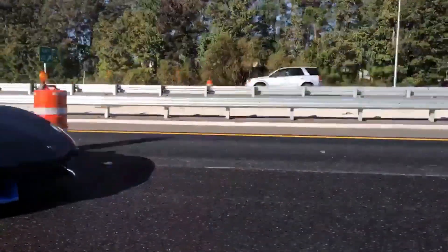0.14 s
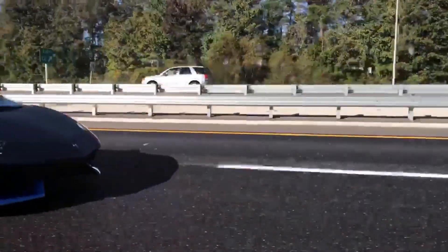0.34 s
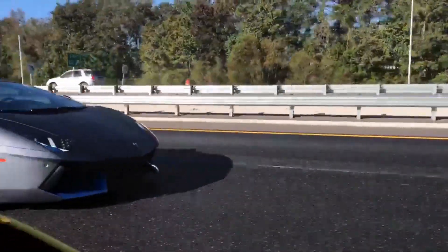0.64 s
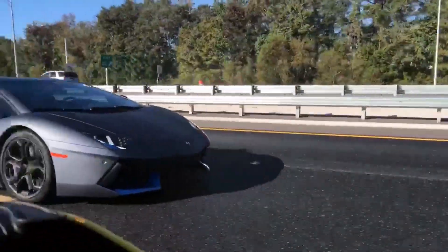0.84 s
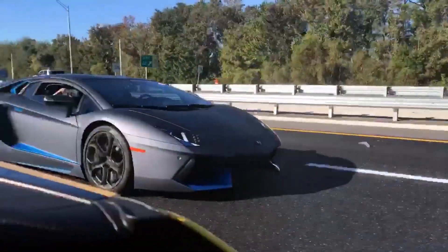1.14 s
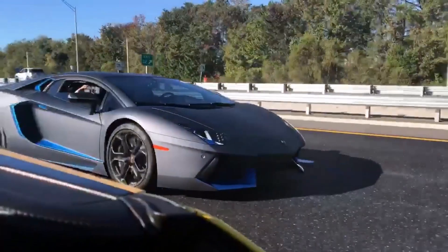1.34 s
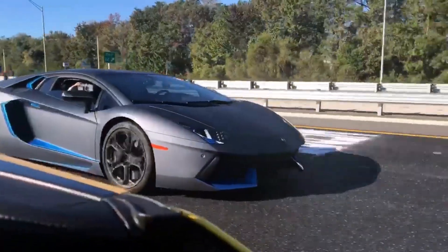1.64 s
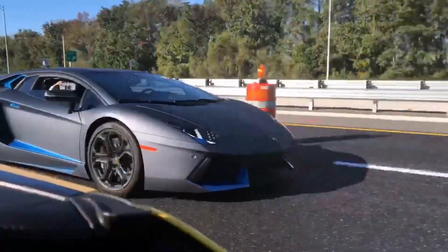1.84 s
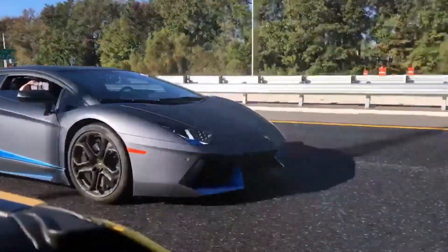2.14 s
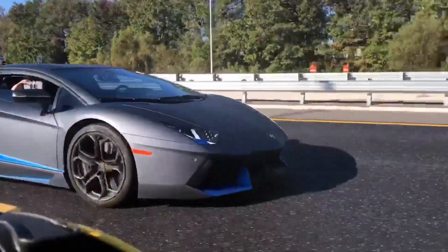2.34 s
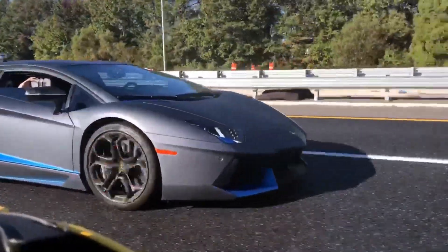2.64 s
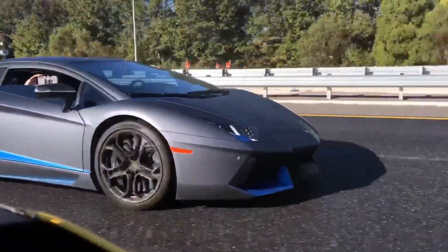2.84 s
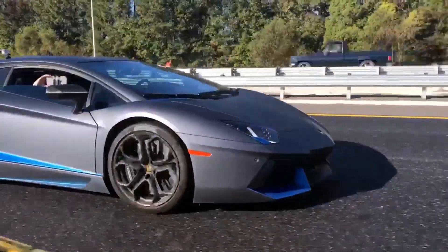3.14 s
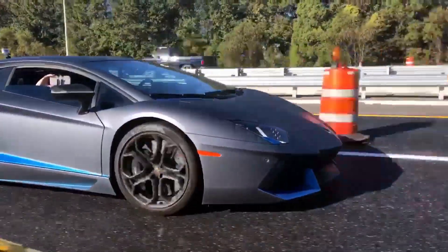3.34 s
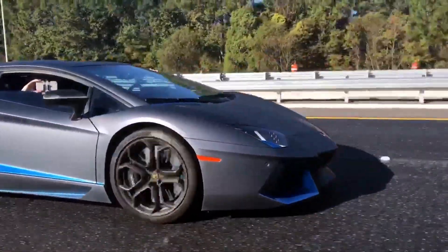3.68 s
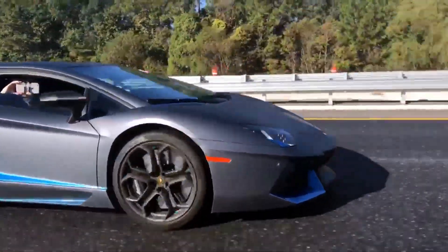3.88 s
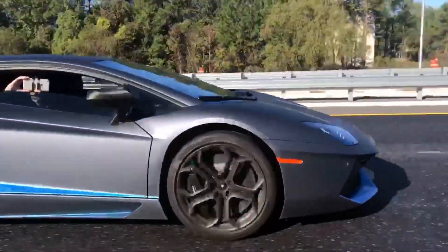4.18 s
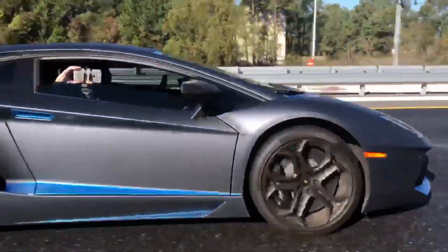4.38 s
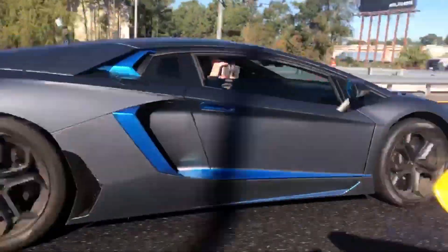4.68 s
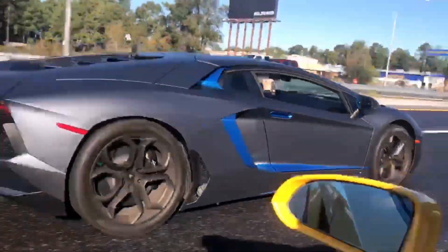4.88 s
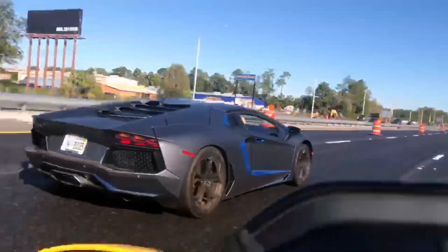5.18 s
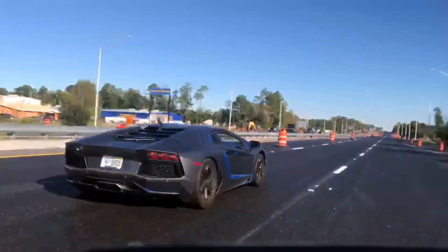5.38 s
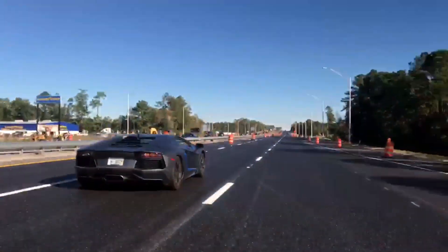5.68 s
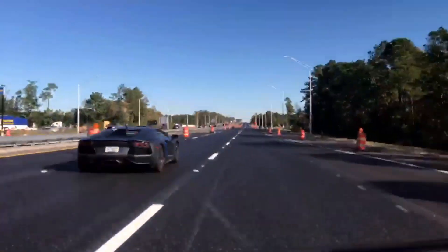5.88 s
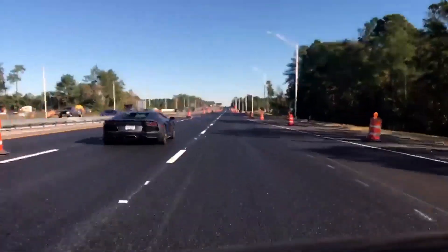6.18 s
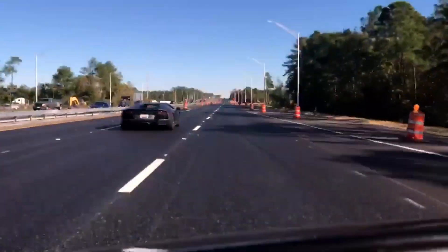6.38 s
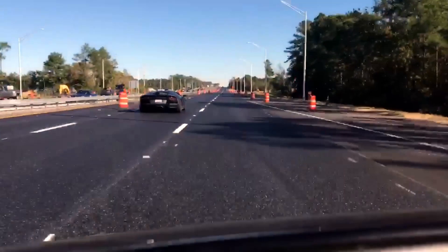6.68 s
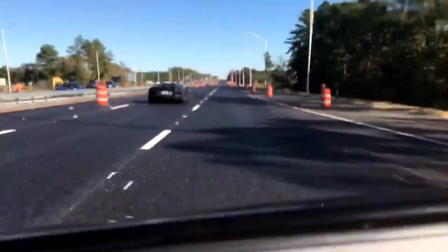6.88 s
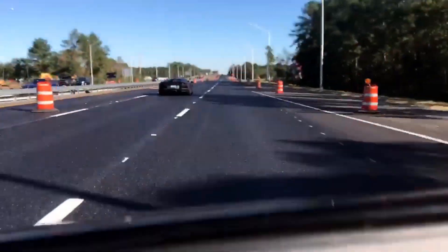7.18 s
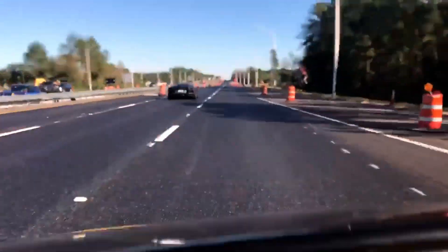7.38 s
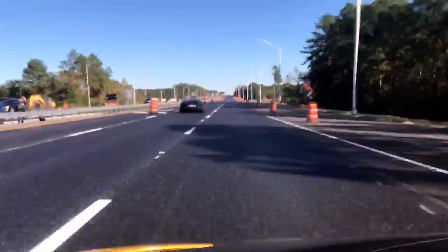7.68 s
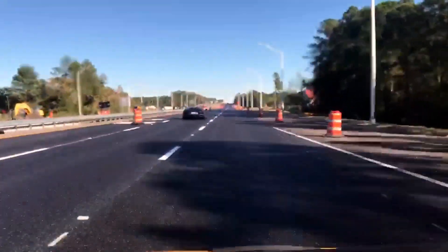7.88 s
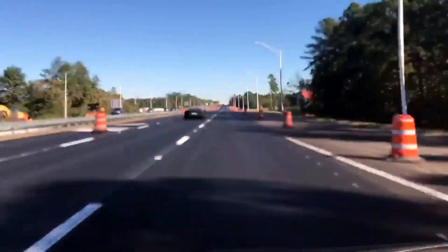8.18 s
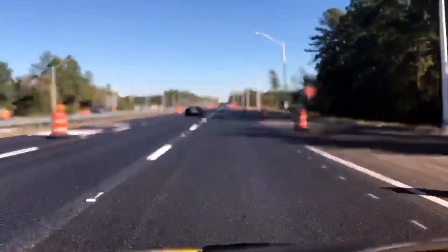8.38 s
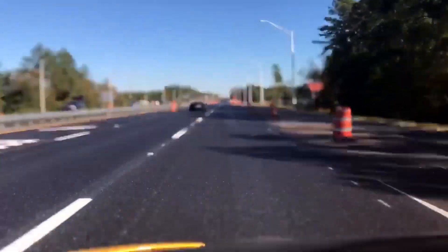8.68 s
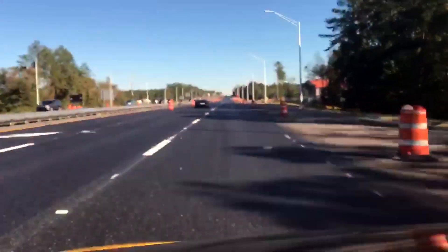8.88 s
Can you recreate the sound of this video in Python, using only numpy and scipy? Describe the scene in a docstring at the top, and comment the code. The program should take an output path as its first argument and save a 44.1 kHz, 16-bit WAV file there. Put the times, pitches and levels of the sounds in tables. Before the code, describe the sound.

Steady low engine hum on a highway, a downshift blip with crackles, a rising twelve-cylinder scream passing close, then overwhelming wind buffeting the microphone.

```python
"""On a highway, beside an open car window: a low engine drone near 240 Hz, then a twelve-cylinder sports car.
It drops gears with a blip and pops, howls past and pulls away; the wind grows in steps to overload.
Engine: rounded orders of the twelve-firing cycle plus gas rasp, set by throttle, view and distance.
Drone: a few harmonics. Tyres, wake and wind: shaped noise. Pops, ticks, bursts and slaps: short and decaying."""
import sys
import numpy as np
from scipy import signal
from scipy.fft import rfft, irfft, next_fast_len
from scipy.io import wavfile
from scipy.ndimage import uniform_filter1d, minimum_filter1d

SR = 44100
rng = np.random.default_rng(int(sys.argv[2]) if len(sys.argv) > 2 else 0)


def transcribe(u):
    """Save the signal u as a 16-bit wav file named by the first command-line argument.

    u: samples, shape (n,) or (channels, n), limited to [-1, 1]; the rate is SR.
    q: integer samples, one column per channel.
    """
    v = np.clip(np.atleast_2d(u).T, -1, 1)
    q = np.round(v * 32767).astype(np.int16)
    wavfile.write(sys.argv[1], SR, q)


N = 398223
T = np.arange(N) / SR


def amp(db):
    """Decibels to gain."""
    return 10 ** (np.asarray(db) / 20)


def unit(x):
    """Scales to an rms of one."""
    return x / np.sqrt(np.mean(x ** 2) + 1e-20)


def curve(rows):
    """Interpolates each column of a timed table to every sample."""
    time_s, *columns = np.transpose(rows)
    return [np.interp(T, time_s, column) for column in columns]


def read(spectrum, hz):
    """Gain of a spectrum table at given frequencies, linear in dB over log frequency."""
    table_hz, db = np.transpose(spectrum)
    return amp(np.interp(np.log(hz + 1), np.log(table_hz), db))


def colour(x, spectrum):
    """Filters a sound by a spectrum table, at unit rms."""
    size = next_fast_len(N + 4096)
    gain = read(spectrum, np.fft.rfftfreq(size, 1 / SR))
    return unit(irfft(rfft(x, size) * gain, size)[:N])


def white():
    """Plain noise."""
    return rng.standard_normal(N)


def wander(hz):
    """Low-passed noise at unit rms: random drift up to a given rate."""
    sos = signal.butter(2, hz, fs=SR, output="sos")
    return unit(signal.sosfilt(sos, rng.standard_normal(N + SR))[SR:])


def band(size, hz, spread):
    """Noise from hz / spread to hz * spread, near unit rms."""
    sos = signal.butter(2, [hz / spread, hz * spread], "bandpass", fs=SR, output="sos")
    # the first second lets the filter settle
    return unit(signal.sosfilt(sos, rng.standard_normal(size + SR)))[SR:]


def ring(hz, rise_s):
    """Damped sine whose envelope peaks at rise_s."""
    t = T[:4096]
    u = t / rise_s
    return np.sin(2 * np.pi * hz * t) * u * np.exp(1 - u)


def ramp(start_s, rise_s):
    """Goes from 0 to 1 and stays there."""
    return np.clip((T - start_s) / rise_s, 0, 1)


def bump(at_s, width_s):
    """Swells from 0 to 1 and back."""
    return np.exp(-((T - at_s) / width_s) ** 2)


def nearness(nearest_s, cover_s):
    """Inverse-square level in dB of a steady pass, 0 at nearest; it covers its nearest distance in cover_s."""
    return -10 * np.log10(1 + ((T - nearest_s) / cover_s) ** 2)


def add(mix, start_s, sound):
    """Lays a sound into the mix."""
    part = mix[round(start_s * SR):][:len(sound)]
    part += sound[:len(part)]


# tyre noise spectrum: freq_hz, density_db
ROAD_SPECTRUM = [(25, -27.5), (45, 10), (100, -4.5), (250, 3), (420, -2.5), (620, -1), (1000, -8.5),
                 (1500, -20.5), (2500, -23.5), (4000, -30.5), (5000, -34.5), (6500, -35.5), (10500, -44),
                 (15500, -45)]
# tyre noise: time_s, level_db
TYRE_LEVEL = [(0, -24), (.8, -26.5), (3.5, -23), (4.3, -28.5), (9, -41)]


def tyres():
    """Tyres on asphalt: shaped noise with slight level wander."""
    return colour(white(), ROAD_SPECTRUM) * amp(curve(TYRE_LEVEL)[0] + 0.93 * wander(11))


# torn-air spectrum: freq_hz, density_db
HISS_SPECTRUM = [(2000, -19.5), (5500, -12), (8000, 8.5), (10400, 3), (12000, 7.5), (16000, 2.5)]


def wake(peak_db=-40, steepness=1.73):
    """Air torn by the passing body: hiss that rises and falls with its distance."""
    return colour(white(), HISS_SPECTRUM) * amp(peak_db + steepness * nearness(nearest_s=5.04, cover_s=0.34))


# steps into the slipstream: start_s, rise_s, buffeting_db, turbulence_db, brightness_db
EXPOSURE_STEPS = [(4.22, 0.16, -31.5, -45, -5), (5.22, 0.069, -20, -25, 3), (6.69, 0.032, -10, -23.5, -2)]
# passing gusts and lulls: centre_s, width_s, buffeting_db, turbulence_db, brightness_db
GUSTS_AND_LULLS = [(.05, .45, -34.5, -64, 0), (2.55, 0.49, -32, -57, 1), (3.45, 0.37, -25, -49, -7),
                   (4.63, .17, -26, -39, -23), (5.37, 0.14, -18, -25.5, 8.5), (6.25, 0.27, -18, -28.5, -9),
                   (7.08, 0.13, -10.5, -24, 5), (8.58, 0.22, -9, -21.5, 6), (8.98, 0.2, -11, -20.5, 1.5)]


def airflow():
    """Buffeting, turbulence and brightness drives in dB: steps hold, gusts pull to their values and let go."""
    sheltered_db = (-40.5, -60, 0)
    state = np.outer(sheltered_db, np.ones(N))
    for shape, rows in (ramp, EXPOSURE_STEPS), (bump, GUSTS_AND_LULLS):
        for at_s, length_s, *target_db in rows:
            state = state + shape(at_s, length_s) * (np.array(target_db)[:, None] - state)
    return state


# wind spectra, low to high: freq_hz, density_db
BUFFET_SPECTRUM = [(20, -23), (40, -8.5), (70, 2.5), (130, 0.5), (220, -6), (400, -14.5), (800, -24.5),
                   (2000, -74)]
ROAR_SPECTRUM = [(60, -45), (150, 3), (270, 3), (500, -0.5), (1000, -6.5), (1600, -15.5), (3000, -36),
                 (6000, -83)]
CRACKLE_SPECTRUM = [(400, -3.5), (1200, 4), (2000, 1), (3500, -3.5), (5000, -13), (6500, -19),
                    (7700, -28.5), (9500, -29), (10500, -48), (16000, -46)]
SIZZLE_SPECTRUM = [(3000, -4), (6000, 4.5), (9500, -6.5), (10600, -8), (15500, -16)]


def wind(impulses_per_s=2400):
    """Large eddies thump the microphone; small ones roar and tear in short bursts."""
    buffet_db, turbulence_db, bright_db = airflow()
    eddies = wander(138)
    pressure = colour(white(), BUFFET_SPECTRUM)
    # tears hardest at pressure peaks, lulls between eddies
    tearing_db = 3.7 * eddies + 3.2 * wander(600) + 1.5 * pressure + wander(12)
    # tiny vortices at the microphone port
    impulses = rng.choice([-1., 1.], N) * (rng.random(N) < impulses_per_s / SR)
    grain = .9 * unit(impulses) + .45 * white()
    buffet = pressure * amp(buffet_db + 2.5)
    roar = colour(white() * amp(3.7 * eddies), ROAR_SPECTRUM) * amp(turbulence_db - 0.1 * bright_db + 11.5)
    crackle = colour(grain * amp(tearing_db), CRACKLE_SPECTRUM) * amp(turbulence_db + 0.95)
    # stronger tearing contrast: the sharpest bursts dominate the treble
    sizzle = colour(grain * amp(1.65 * tearing_db), SIZZLE_SPECTRUM) * amp(turbulence_db + bright_db - 18)
    return buffet + roar + crackle + sizzle


# air throbs in the open window: centre_s, width_s, peak_db
WINDOW_THROBS = [(2.8, 0.4, -25), (4.78, 0.3, -21)]


def window_throbs():
    """Slow throbs of air in the open window: swells of narrow noise near 49 Hz."""
    swell = sum(amp(db) * bump(centre_s, width_s) for centre_s, width_s, db in WINDOW_THROBS)
    return band(N, 49, spread=1.25) * swell


# short noise bursts within the wind: start_s, level_db
WIND_BURSTS = [(5.838, -17), (6.159, -20), (6.396, -13.5), (8.059, -13), (8.511, -16)]


def wind_bursts(centre_hz=3170, decay_s=0.0014):
    """Short noise bursts within the wind: band noise with a fast exponential decay."""
    out, t = np.zeros(N), T[:1024]
    for start_s, db in WIND_BURSTS:
        add(out, start_s, amp(db) * band(len(t), centre_hz, spread=1.5) * np.exp(-t / decay_s))
    return out


# single gusts: start_s, drive_db
GUST_SLAPS = [(2.559, -10.5), (4.437, -13), (4.731, -11), (4.799, -19), (4.934, -14)]


def gust_slaps():
    """Gusts slap the microphone: a damped 150 Hz swing and a 30 ms noise swell."""
    out = np.zeros(N)
    swell = np.hanning(round(.03 * SR))
    for start_s, db in GUST_SLAPS:
        add(out, start_s, amp(db - 4) * ring(150, rise_s=.003))
        add(out, start_s, amp(db - 6) * swell * unit(band(len(swell), 190, spread=1.8)))
    return out


# ticks and grit: start_s, level_db, centre_hz, decay_s
GRIT_TICKS = [(.18, -38, 10900, .004), (.2, -41, 10000, .003), (.239, -44, 12000, .012),
              (.519, -36, 4970, 0.0041), (3.207, -31, 5200, 0.014), (3.62, -43, 5430, .01),
              (4.632, -20.5, 2520, 0.0027), (4.71, -33, 9100, 0.007), (5.4435, -10, 5860, 0.00081)]


def ticks():
    """Small ticks and grit near the microphone: decaying noise bursts."""
    out, t = np.zeros(N), T[:4096]
    for start_s, db, centre_hz, decay_s in GRIT_TICKS:
        add(out, start_s, amp(db) * band(len(t), centre_hz, spread=1.67) * np.exp(-t / decay_s))
    return out


# low engine drone: time_s, pitch_hz, level_db
DRONE_NOTE = [(0.0, 229.5, -16), (0.93, 234.1, -15.5), (2.24, 244.1, -16.5), (3.24, 238.6, -18),
              (3.4, 233, -29), (3.63, 253.7, -21.5), (3.77, 246, -25), (3.9, 248, -48)]
# drone harmonics: multiple, relative_db
DRONE_HARMONICS = [(1, 10.5), (2, -29), (3, -50)]


def drone():
    """Low engine drone near 240 Hz: almost a pure tone, with slight random drift of phase and level."""
    pitch_hz, level_db = curve(DRONE_NOTE)
    phase = 2 * np.pi * np.cumsum(pitch_hz) / SR + 0.096 * wander(25)
    tone = sum(amp(db) * np.cos(multiple * phase) for multiple, db in DRONE_HARMONICS)
    return unit(tone) * amp(level_db + 0.61 * wander(20))


# exhaust pops: start_s, crack_db, crack_hz, decay_s, thump_db (levels are drives)
EXHAUST_POPS = [(2.275, -20, 1150, 0.0016, -5), (3.057, -5.5, 1020, 0.002, 6),
                (3.283, -15, 900, 0.002, -15), (3.315, -9, 1290, 0.004, -25),
                (3.3178, -36, 2100, 0.0033, -3), (3.325, -17, 1500, 0.001, -9),
                (3.353, -17, 1250, 0.0035, -7), (3.363, -20, 1080, 0.0062, -15),
                (3.435, -11, 1570, 0.00086, -10), (3.464, -15, 1440, 0.0012, -13),
                (3.528, -13.5, 1400, 0.0013, -16), (3.785, -28, 1364, 0.017, -1.5)]


def pops(thump_hz=205, blast_hz=650):
    """Unburnt fuel cracks in the exhaust, spits gas, then thumps the pipe."""
    out, t = np.zeros(N), T[:4096]
    for start_s, crack_db, crack_hz, decay_s, thump_db in EXHAUST_POPS:
        envelope = np.exp(-t / decay_s) * (1 - np.exp(-t * crack_hz))
        gas = band(len(t), crack_hz, spread=1.7) * envelope
        crack = ring(crack_hz, rise_s=.7 / crack_hz)
        add(out, start_s, amp(crack_db) * .8 * (crack + gas))
        add(out, start_s + 0.0011, amp(crack_db + 2.5) * ring(blast_hz, rise_s=0.00061))
        add(out, start_s + 0.0021, amp(thump_db - 2) * ring(thump_hz, rise_s=0.0014))
    return out


# revs through the downshift: time_s, firing_hz
DOWNSHIFT_REVS = [(3.39, 228), (3.43, 240), (3.48, 275), (3.57, 420), (3.7, 396), (3.77, 404), (3.84, 443)]


def firing_rate(pull_s=4.05, climb_hz_per_s=171, drag_s=5.7):
    """Revs flare for the downshift, then climb ever more slowly against drag."""
    pulled_s = np.maximum(T - pull_s, 0)
    return curve(DOWNSHIFT_REVS)[0] + climb_hz_per_s * drag_s * (1 - np.exp(-pulled_s / drag_s))


# a blip, then flat out: opens_s, opening_s, shuts_s, gain_db, surge_db
THROTTLE_PRESSES = [(3.4, 0.017, 3.572, 3, 6.5), (3.645, 0.1, 6.5, 0, 3.5)]


def throttle(surge_s=0.074, release_s=0.024):
    """Engine gain: each press opens with a surge, holds and is released."""
    gain = np.zeros(N)
    for opens_s, opening_s, shuts_s, db, surge_db in THROTTLE_PRESSES:
        surge = surge_db * bump(opens_s + opening_s, surge_s)
        release = np.exp(-np.maximum(T - shuts_s, 0) / release_s)
        gain += amp(db + surge) * ramp(opens_s, opening_s) * release
    return gain


# view of the car: time_s, share_from_behind_0_to_1
REAR_VIEW = [(4.5, 0.37), (4.85, 0.38), (5.08, 0.89)]


def rear_view():
    """Share of the sound heard from behind rather than from the side."""
    return curve(REAR_VIEW)[0]


def tailpipe(peak_db, steepness, fade_db_per_s, nearest_s=5.29, cover_s=0.24):
    """Distance level in dB of upper exhaust sound: grows to nearest, fades fast once the pipe is ahead."""
    return peak_db + steepness * nearness(nearest_s, cover_s) - fade_db_per_s * np.maximum(T - nearest_s, 0)


# one swell or dip each: order, side_db, rear_db, swell_at_s, swell_db, swell_width_s
LOW_ORDER_LEVELS = [(6, -35, -33.5, 4.97, 16, 0.32), (9, -21, -25.5, 4.4, 3.5, 0.11),
                    (12, -20.5, -17, 4.9, -10.5, 0.093)]


def low_orders(cycle, in_gear, load_db, leaving_s=4.89, rough_free=0.71, rough_in_gear=0.068):
    """Firing tone (order 12) and lower orders, chopped by uneven combustion."""
    behind = rear_view()
    away_db = nearness(leaving_s, cover_s=0.36) * (T > leaving_s)
    low = np.zeros(N)
    for order, side_db, rear_db, swell_at_s, swell_db, width_s in LOW_ORDER_LEVELS:
        db = side_db + behind * (rear_db - side_db) + swell_db * bump(swell_at_s, width_s) + away_db
        # only the firing tone keeps its level unloaded
        db += load_db * (order != 12)
        low += np.sqrt(2) * amp(db + 1.1 * wander(25)) * np.cos(order * cycle)
    roughness = rough_free + in_gear * (rough_in_gear - rough_free)
    # once per crank turn, plus random
    return low * (1 + roughness * (np.cos(2 * cycle) + wander(130)) / 2)


# upper orders, phase uses the rounded order: order, side_db, rear_db
OVERTONE_LEVELS = [(3, -20, 1.5), (15, -4, -21), (17.9, -7, -7), (21, -16, 2), (21.7, -4, -23),
                   (23.8, -11.5, -2.5), (27, -9, -14), (30, -7, -19.5), (33, -17, -4.5), (42, -21, -11),
                   (45, -30, -22), (48, -20, -10), (66, -28, -4.5), (77.7, -39, -8)]


def overtones(cycle, cycle_hz, pipe_hz=820, pipe_width_hz=45, pipe_db=9):
    """Fluttering cycle orders, each swelling as it climbs through the pipe resonance."""
    behind = rear_view()
    # sound bent round the body flutters more than direct tailpipe sound
    flutter_depth_db, jitter_rad = 4 - 1.8 * behind, .55 - .35 * behind
    high = np.zeros(N)
    for order, side_db, rear_db in OVERTONE_LEVELS:
        boost_db = pipe_db / (1 + ((order * cycle_hz - pipe_hz) / pipe_width_hz) ** 2)
        db = side_db + behind * (rear_db - side_db) + boost_db + flutter_depth_db * wander(13)
        jitter = jitter_rad * max(1, order / 24) * wander(30)
        high += amp(db) * np.cos(round(order) * cycle + jitter + 2 * np.pi * rng.random())
    return high


# exhaust gas spectrum: freq_hz, density_db
RASP_SPECTRUM = [(200, -22), (700, -7), (1200, 4), (1900, 1), (2400, 4), (2900, -1.5), (3600, -3),
                 (4900, -12), (6200, -7), (8000, -19), (10500, -18), (16000, -38)]


def rasp(cycle, mean_cycle_hz):
    """Gas noise pulsing six times a cycle, plus weak lines because no two cylinders fire alike."""
    orders = np.arange(10, 110)
    lines = np.zeros(2049, complex)
    phases = np.exp(2j * np.pi * rng.random(len(orders)))
    lines[orders] = read(RASP_SPECTRUM, orders * mean_cycle_hz) * phases
    # one cycle's waveform, played at the cycle phase
    shape = unit(irfft(lines))
    uneven = np.interp(cycle / (2 * np.pi), np.arange(len(shape)) / len(shape), shape, period=1)
    gas = colour(white() * (1 + .6 * np.cos(6 * cycle)), RASP_SPECTRUM)
    return .68 * gas + .62 * uneven * amp(2.4 * wander(40))


def engine(bite_s=3.77, bite_takes_s=0.069, unloaded_db=-4.5):
    """Twelve firings a cycle; until the clutch bites it stumbles and all but its firing tone is weaker."""
    cycle_hz = firing_rate() / 12
    cycle = 2 * np.pi * np.cumsum(cycle_hz) / SR + .008 * wander(50)
    in_gear = ramp(bite_s, bite_takes_s)
    load_db = unloaded_db * (1 - in_gear)
    overtone_db = tailpipe(peak_db=-18.5, steepness=0.6, fade_db_per_s=55) + load_db
    rasp_db = tailpipe(peak_db=-21, steepness=1.35, fade_db_per_s=17) + load_db
    mean_cycle_hz = np.average(cycle_hz, weights=in_gear * amp(rasp_db))
    low = low_orders(cycle, in_gear, load_db)
    high = 0.68 * amp(overtone_db) * overtones(cycle, cycle_hz)
    return throttle() * (low + high + amp(rasp_db) * rasp(cycle, mean_cycle_hz))


def scene():
    """Sums all sources at one microphone; the engine is released at 6.5 s and fades out."""
    air = wind() + window_throbs() + wind_bursts() + gust_slaps()
    in_earshot = 1 - ramp(6.5, .7)
    engines = drone() + pops() + in_earshot * engine()
    return (tyres() + wake() + air + ticks() + engines)[None]


def record(dry, ceiling=0.8, edge_hz=15800):
    """A fast limiter holds the peaks under a ceiling; then a low-pass sets the band limit."""
    room = np.minimum(1, ceiling / (abs(dry) + 1e-9))
    # 90 samples: about 2 ms
    gain = uniform_filter1d(minimum_filter1d(room, size=90), size=90)
    lowpass = signal.firwin(511, edge_hz, window=("kaiser", 9), fs=SR)
    return signal.oaconvolve(dry * gain, lowpass[None], "same")


dry = scene()
out = record(dry)
transcribe(out)
```